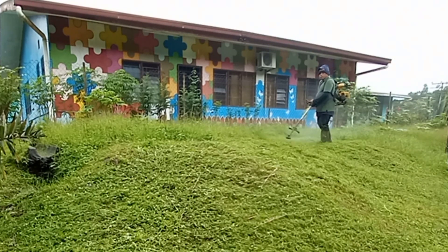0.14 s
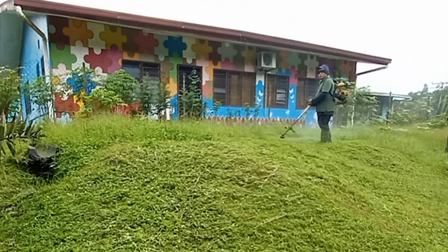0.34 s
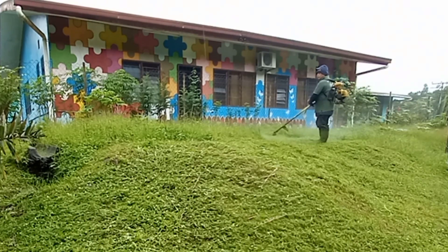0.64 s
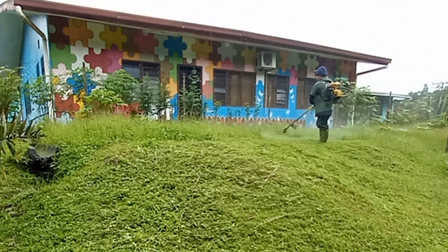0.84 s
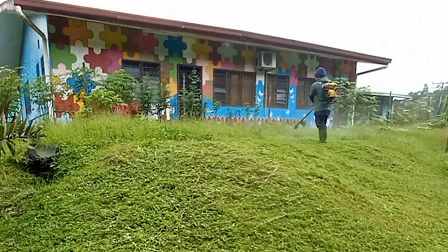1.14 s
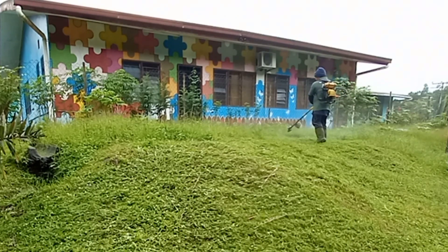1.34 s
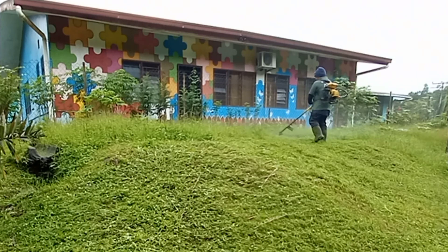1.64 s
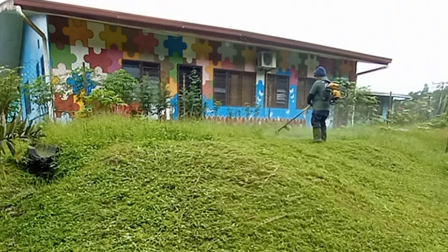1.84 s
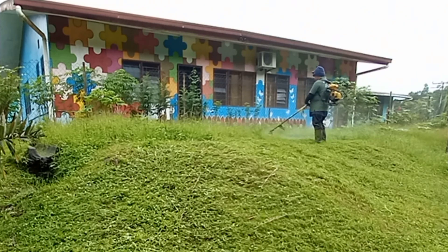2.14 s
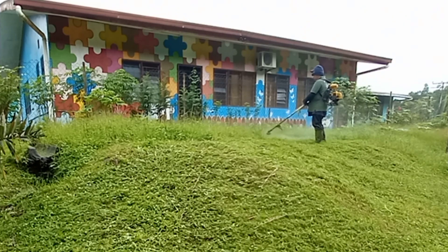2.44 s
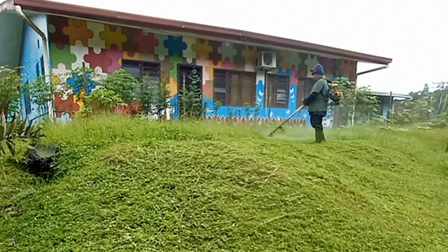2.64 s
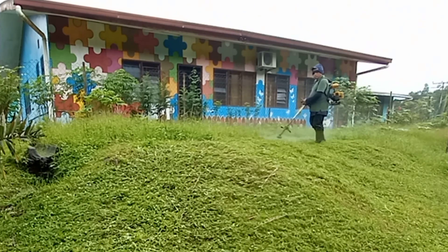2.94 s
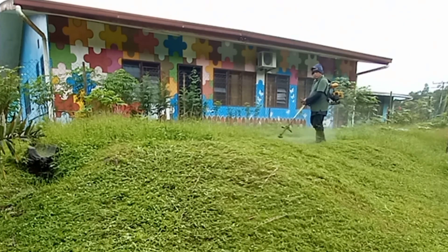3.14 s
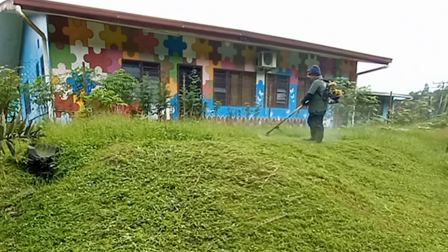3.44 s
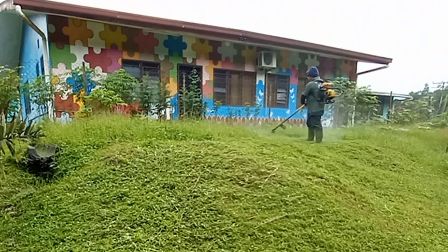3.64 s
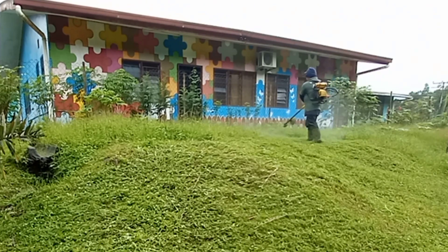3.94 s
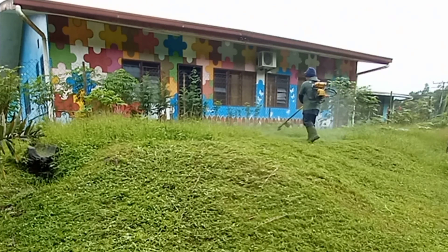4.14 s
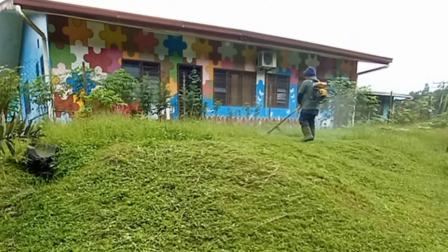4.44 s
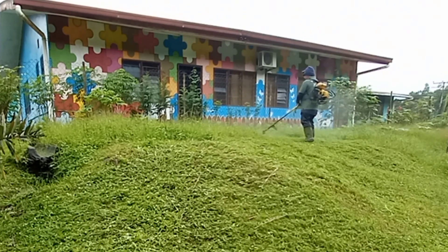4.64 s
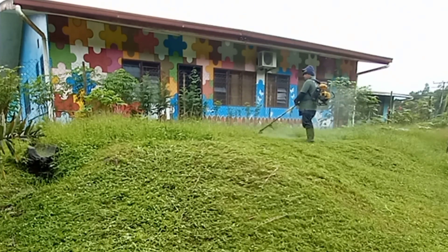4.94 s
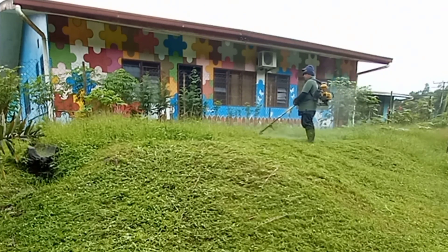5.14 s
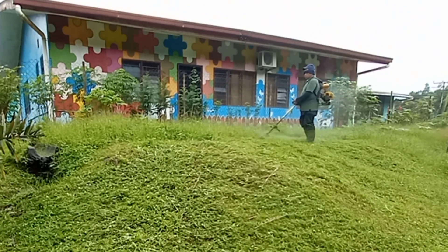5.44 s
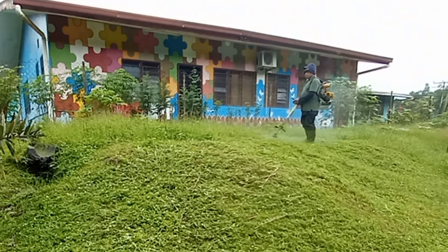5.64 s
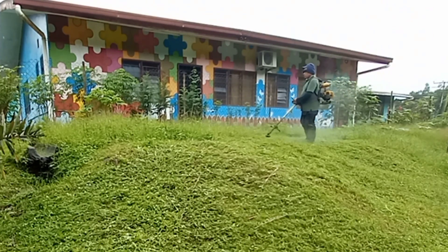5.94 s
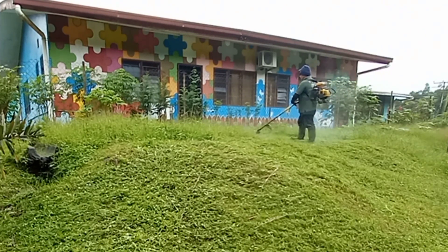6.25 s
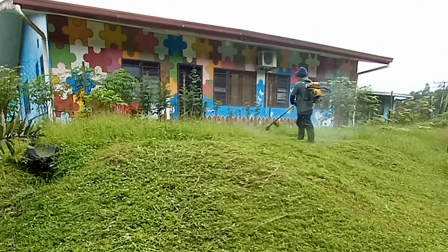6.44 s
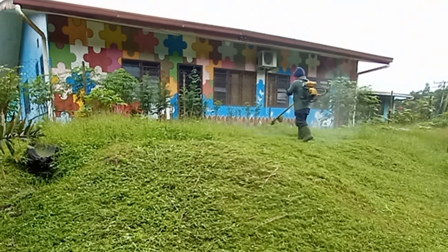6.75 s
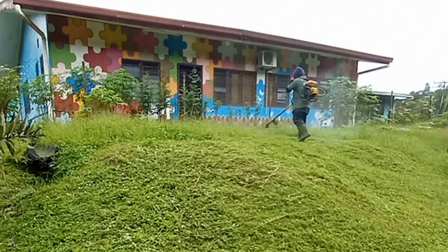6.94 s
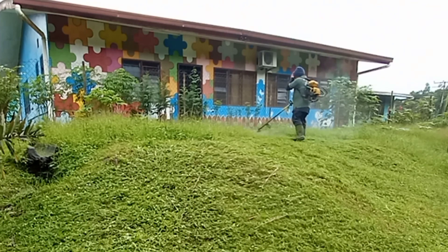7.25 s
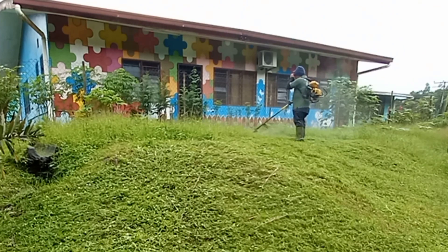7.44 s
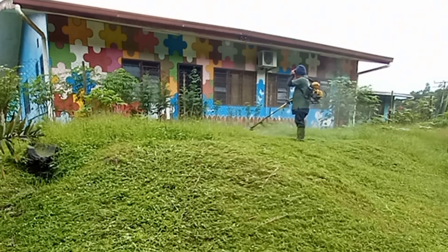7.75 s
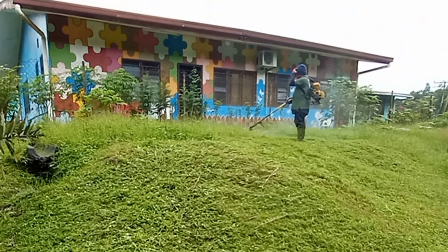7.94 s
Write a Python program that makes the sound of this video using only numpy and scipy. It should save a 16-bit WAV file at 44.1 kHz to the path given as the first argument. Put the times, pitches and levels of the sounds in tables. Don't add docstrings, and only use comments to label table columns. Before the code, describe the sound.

From 0 to about 8 seconds a backpack brush cutter works without a break, some metres from a stereo phone outdoors near a wall. Its small engine holds a low, buzzing drone near 116 hertz, with puffing muffler roar and gusty deep rumble; overtones wax and wane as the worker swings and walks. The blade hum wanders between about 80 and 112 hertz, beating against the engine: it sags in grass around 0.5-0.9, 1.5-2.9, 3.4-3.8, 4.3-5.5 and 6-6.6 seconds, recovering between. Pulsing bright hiss and crisp leaf tearing swell and thin with tufts. Tiny sharp stalk snaps scatter throughout, clustering near 0.8-0.9, 2.7, 4.0, 5.0-5.5 and 6.1 seconds, some with a duller knock. The hardest, at 2.24, 4.0 and 6.1, briefly duck everything. The sound ends still cutting, with snaps near 7.9-8.1.

```python
import sys
import numpy as np
from scipy import signal
from scipy.fft import rfft, irfft
from scipy.io import wavfile
from scipy.ndimage import uniform_filter1d

SR = 44100
rng = np.random.default_rng(int(sys.argv[2]) if len(sys.argv) > 2 else 0)


def file_out(sig):
    cols = np.atleast_2d(sig).T
    lim = np.clip(cols, -1, 1)
    pcm = np.round(lim * 32767).astype(np.int16)
    wavfile.write(sys.argv[1], SR, pcm)


def magnitude_from_level(level_db):
    exponent = np.asarray(level_db, float) / 20
    return 10 ** exponent


N = 356769
T = np.arange(N) / SR
SLOW_T = T[::64]


def evened(x):
    return x / np.sqrt(np.mean(x ** 2) + 1e-20)


def read(points, hz):
    f, value = np.transpose(points)
    return np.interp(np.log(hz + 1), np.log(f + 1), value)


def curves(rows):
    s, *columns = np.transpose(rows)
    return [np.interp(T, s, c) for c in columns]


def drift(top_hz):
    low_pass = signal.butter(2, top_hz, fs=SR, output="sos")
    return evened(signal.sosfilt(low_pass, rng.standard_normal(N)))


# frequency in Hz, share of sound in common (0-1).
PORT_LIKENESS = [(60, 1), (350, 0.84), (800, 1), (1400, 0.86), (2100, 0.47), (2800, 0.63), (4500, 0.45),
                 (15000, 0.15)]
# frequency in Hz, lead of the left in radians.
LEFT_LEAD = [(100, -.1), (1800, -1.5), (2500, -3.1), (5200, -4.3), (6400, -3.8), (8600, -2.8), (11200, -7),
             (16000, -11)]


def pair_noise(colour, patchy_db, focus=1):
    frames, hz = N // 128 + 5, np.fft.rfftfreq(512, 1 / SR)
    a, b, c, d, patches = rng.standard_normal((frames, 257, 5)).T
    patches = uniform_filter1d(patches, size=9, axis=0)
    patches = evened(uniform_filter1d(patches, size=20, axis=1))
    same = np.clip(read(PORT_LIKENESS, hz), 0, 1)[:, None] ** focus
    right = a + 1j * b
    left_own = c + 1j * d
    lead = np.exp(1j * read(LEFT_LEAD, hz))[:, None]
    left = same * right * lead + np.sqrt(1 - same ** 2) * left_own
    z = np.array([left, right]) * magnitude_from_level(read(colour, hz)[:, None] + patchy_db * patches)
    return evened(signal.istft(z, nperseg=512, noverlap=384)[1][:, :N])


def beat(turns, start, rise, fall, depth):
    u = (turns - start) % 1
    return evened(1 + depth * (1 - np.exp(-u / rise)) * np.exp(-u / fall))


# time in seconds, firings in Hz.
CRANK_SPEED = [(0.0, 115.9), (0.3, 116.64), (0.75, 117.37), (1.1, 116.47), (1.5, 115.92), (1.9, 116.3),
               (2.3, 116.53), (2.75, 116.33), (3.1, 116.31), (3.7, 117.27), (4.3, 115.92), (5.0, 116.41),
               (5.65, 115.98), (6.25, 117.37), (6.9, 115.84), (7.35, 116.26), (7.8, 116.25), (8.09, 116.15)]


def crank_turns():
    return np.cumsum(curves(CRANK_SPEED)[0]) / SR


# time in seconds, turn, lean, stoop (each about -2 to 2).
SWING_POSE = [(0.0, 0.16, 0.17, -1.5), (0.46, 0.54, 0.4, -1), (0.72, 1.2, -0.96, 2),
              (0.95, -0.16, 1.7, 3.2), (1.2, -1.73, 0.2, 1), (1.6, -1.3, 0.11, 0.7),
              (2.1, -0.69, -0.94, 1.5), (2.6, 0.86, -1.1, 0.6), (3.1, 1.26, 2.9, -0.5),
              (3.55, 1.4, -0.49, 1.5), (3.95, -1.45, 0.95, 1.3), (4.4, -0.81, 0.88, 1.8),
              (4.9, -0.72, -1.7, 0.5), (5.32, 1.45, -0.42, 0.4), (5.9, 2.1, 2.4, 2.5),
              (6.3, 0.59, -0.93, 0.2), (6.75, -1.07, 0.82, 0.1), (7.86, -0.31, -1.6, -0.2)]


def worker_pose():
    return curves(SWING_POSE)


# start in seconds, drag (0-1).
BLADE_DRAG = [(0, .03), (.48, 1.04), (.93, .16), (1.44, .88), (2.1, .58), (2.36, .7), (2.7, 1.1), (2.94, 0),
              (3.38, 1.18), (3.6, .92), (3.87, .06), (4.3, .9), (4.7, .52), (5.24, .82), (5.6, 0),
              (5.99, 1.14), (6.35, .85), (6.63, .03), (7.02, .5), (7.7, .36)]
FREE_HZ, SAG_HZ, START_HZ = 112, 31, 96
SPIN_UP_S, SAG_S = .17, .11
MID_HZ = 95


def blade_speed():
    hz, now = np.zeros(N), START_HZ
    for (s, drag), (end, _) in zip(BLADE_DRAG, BLADE_DRAG[1:] + [(N / SR, 0)]):
        goal = FREE_HZ - SAG_HZ * drag
        lag = SAG_S if goal < now else SPIN_UP_S
        hz = np.where(T >= s, goal + (now - goal) * np.exp(-abs(T - s) / lag), hz)
        now = goal + (now - goal) * np.exp((s - end) / lag)
    return uniform_filter1d(hz, size=3000)


# middle in seconds, half length in seconds, leaves in dB, stems in dB.
GRASS_TUFTS = [(0.262, 0.1, 0.77, -2), (0.528, 0.046, 4.5, 3.64), (0.62, 0.109, -0.2, 2),
               (0.862, 0.065, 0.3, 0.3), (1.188, 0.08, 1, -0.5), (1.487, 0.13, 0.64, 0.5),
               (1.85, 0.35, 1.06, 2.1), (2.274, 0.08, 4, 3), (2.496, 0.15, 3.5, 2),
               (2.768, 0.08, 2.98, 4.5), (2.955, 0.12, -1.35, 0.9), (3.196, 0.097, 0.4, -2),
               (3.424, 0.07, 2, 6.5), (3.53, 0.05, -1.23, 0.5), (3.76, 0.07, 4.5, -1),
               (3.994, 0.091, 0.04, -1.16), (4.25, 0.18, 3.5, -1.5), (4.448, 0.27, 0.23, 4.1),
               (4.7, 0.061, -0.04, -0.5), (4.915, 0.12, 2.5, 3), (5.32, 0.25, 2.2, 5),
               (5.679, 0.126, 0.36, 0.5), (5.999, 0.12, 1.5, 2.5), (6.1, 0.0344, 1.1, 3.69),
               (6.356, 0.15, 2.96, 1.3), (6.85, 0.3, 3.5, -1), (7.207, 0.11, 1.35, 4), (7.545, 0.25, 2, 3),
               (7.75, 0.1, 3.5, 0), (8.048, 0.2, 4, 3.5)]


def tufts():
    s, half, leaf_db, stem_db = np.transpose(GRASS_TUFTS)
    bells = np.exp(-((SLOW_T[:, None] - s) / half) ** 2)
    return [np.interp(T, SLOW_T, bells @ db) for db in (leaf_db, stem_db)]


# frequency in Hz, level in dB per Hz.
RUMBLE_COLOUR = [(20, -30), (50, -11), (75, -7), (100, -6.5), (130, -4.5), (170, -7.5), (200, -7)]
# frequency in Hz, level in dB per Hz.
ROAR_COLOUR = [(170, -54), (250, -6.5), (500, -5), (900, -5.5), (1600, -7.5), (2100, -11), (2800, -12.5),
               (4000, -51)]


def roar(turns, fast, stem_db):
    level_db = -33 - 0.02 * fast + stem_db
    hz = np.fft.rfftfreq(N, 1 / SR)
    shared, left, right = rng.standard_normal((3, N))
    gusts = np.array([left, right]) * magnitude_from_level(9.5 * drift(4.0))
    low = rfft(shared) + rfft(gusts) * 0.67 / (1 + (hz / 55) ** 2)
    rumble = evened(irfft(low * magnitude_from_level(read(RUMBLE_COLOUR, hz)) * (hz < 200), N))
    puffs = beat(turns, 0.476, 0.04, 0.11, depth=0.86)
    body = pair_noise(ROAR_COLOUR, patchy_db=1.82) * puffs
    return magnitude_from_level(level_db) * (body + magnitude_from_level(-9.0) * rumble)


def fan(turns):
    return beat(turns, .75, .05, .13, depth=.9)


def strokes(passes, spread_db, lopsided_db):
    chance = np.minimum(rng.exponential(1, size=1200), 4)
    load_db = chance * spread_db + lopsided_db * (np.arange(1200) % 2)
    return beat(passes, 0, 0.023, 0.13, depth=0.41 * magnitude_from_level(load_db[passes.astype(int)]))


# frequency in Hz, level in dB per Hz.
HISS_COLOUR = [(1500, -37), (2300, -8.5), (3000, 1.5), (4200, 0), (5200, -0.5), (6500, -5.5), (9000, -8.5),
               (16000, -19)]


def hiss(turns, passes, fast, leaf_db, turn):
    level_db = -38.0 + 0.095 * fast + 0.32 * leaf_db - 0.72 * turn
    air = pair_noise(HISS_COLOUR, patchy_db=0.5)
    pulses = fan(turns) * strokes(passes, spread_db=4.5, lopsided_db=-7.0)
    return magnitude_from_level(level_db + 4.0) * air * pulses


# frequency in Hz, level in dB per Hz.
SHRED_COLOUR = [(3000, -7), (5500, -9), (7000, 1.5), (8500, -1.5), (11000, 3), (12500, 4.5), (13800, 3),
                (16000, -0.5)]


def shred(turns, passes, fast, leaf_db):
    level_db = -37 + 0.0463 * fast + leaf_db
    tearing = pair_noise(SHRED_COLOUR, patchy_db=1.0)
    pulses = fan(turns) * strokes(passes, spread_db=4, lopsided_db=11.0)
    return magnitude_from_level(level_db + 1.37) * tearing * pulses


# start in seconds, bright part in dB, length in ms, dull part in dB.
HARD_SNAPS = [(.8075, -21, 0.89, -12), (.8437, -20, 0.6, -20), (.9194, -20, 0.98, -22),
              (1.899, -24, 1.27, -10), (2.2937, -22, 1.1, -22), (2.3894, -24, 2.1, -11),
              (2.6982, -23, 1, -4), (2.7454, -23, 0.84, -9), (3.6985, -21, 1.1, -20),
              (3.7619, -25, 0.88, -20), (3.9562, -25, 1.0, -19), (3.9955, -22.5, 3.4, -17),
              (4.1868, -24, 1.1, -15), (4.2969, -20, 1.02, -20), (4.9721, -21, 1.22, -16),
              (5.0149, -23, 1.27, -16), (5.1598, -24, 1.2, -13), (5.2563, -19, 1.15, -42),
              (5.3335, -22, 1.12, -16), (5.4204, -21, 1.3, -12), (5.533, -22, 1.2, -20),
              (6.0187, -23, 1.2, -21), (6.0964, -24, 1.2, -20), (6.1025, -18.5, 3.3, -17),
              (6.1335, -24, 1.05, -20), (6.4523, -20, 0.88, -12), (6.524, -26, 1.87, -9),
              (7.7461, -30, 1.0, -9), (7.9096, -23.5, .99, -13), (8.0694, -23, 0.96, -20)]
# start in seconds, bright part in dB.
TWIG_SNAPS = [(.6373, -26), (.857, -25), (1.1827, -28), (1.232, -30), (1.8769, -28), (2.2376, -29),
              (2.4337, -27), (2.4477, -25), (2.6538, -28), (2.7692, -24), (2.781, -26), (2.793, -24),
              (3.407, -22), (3.4936, -26), (3.546, -26), (3.597, -23), (4.111, -23), (4.9084, -25),
              (5.2022, -24.5), (5.287, -26), (5.353, -22), (5.4423, -24), (5.5098, -26), (5.9413, -23),
              (5.9795, -24), (6.3307, -24), (6.5848, -26), (6.7293, -25), (7.9877, -24), (8.0314, -24)]
TWIG_MS, TWIG_DULL_DB = 1.3, -19.5
# frequency in Hz, level in dB per Hz.
CRACK_COLOUR = [(4500, -5), (7000, 5), (9000, 0), (11500, 5), (13500, 1), (16000, -3.5)]


def snaps():
    twigs = [(s, db, TWIG_MS, TWIG_DULL_DB) for s, db in TWIG_SNAPS]
    s, db, length_ms, low_db = np.transpose(HARD_SNAPS + twigs)
    u = np.arange(600) / SR / (0.0012 * np.clip(length_ms, .3, 6))[:, None]
    shape = np.sin(np.pi * np.clip(u / 1.4, 0, 1) ** 1.14) + 0.088 * np.exp(-u / 1.3)
    at = np.round(s * SR).astype(int)[:, None] + np.arange(600) - 6
    bright, dull = np.zeros((2, N + 600))
    np.add.at(bright, at, magnitude_from_level(db + 1.6)[:, None] * shape)
    np.add.at(dull, at, magnitude_from_level(db + low_db + 9.5)[:, None] * shape)
    crack = bright[:N] * pair_noise(CRACK_COLOUR, patchy_db=-1.5, focus=0.62)
    thud = dull[:N] * pair_noise(HISS_COLOUR, patchy_db=9.5, focus=0.37)
    return crack + thud


def thrum(passes, fast, stem_db):
    level_db = -38.5 + 0.31 * fast + 0.22 * stem_db
    tone = np.cos(2 * np.pi * passes) + magnitude_from_level(-11.5) * np.cos(4 * np.pi * passes)
    return np.sqrt(2) * magnitude_from_level(level_db + 1.2 * drift(23)) * tone


# rms in dB, dB per turn, dB per lean, dB per stoop, dB per step.
EXHAUST_ORDERS = [(-21, 0.4, -0.44, 0.27, -0.5), (-37, -3.5, -0.04, 1.5, 1.06),
                  (-37.5, -0.2, -0.5, -4, 1.5), (-34, -0.5, -0.2, 0.5, 1.85), (-35.5, 1, -1.0, 0.1, -0.45),
                  (-34.6, -2.5, -1.5, -0.45, -1.2), (-40.5, 0.5, -0.7, -0.3, 0.1),
                  (-44, -0.3, 0, -0.2, -1.5), (-41.5, -2.2, 1.6, -0.4, -0.5), (-48, 2.5, -0.5, -2, -1),
                  (-60, -8, 8.5, -1.5, -1), (-44, -2.9, 1.5, 1.7, 1.5), (-43.5, -3, 1.7, -1, -1.4),
                  (-52, -1, -1, 4.5, 11.5), (-52.5, -4.5, 1.5, 1.5, 3), (-57.0, -3, 5, 3, 1),
                  (-60.5, 7, -6, -0.5, -3), (-49.5, -1, -3, -2, -2), (-55.1, -6, -6, -7, 0),
                  (-48, -3, 2, 0.2, 1.8)]
STEP_START, STEPS_PER_S = -1.84, 0.33


def exhaust(turns, pose):
    turn, lean, stoop = (c[::64] for c in pose)
    step = STEP_START + STEPS_PER_S * SLOW_T
    lead = .215 + .025 * turn
    uneven_burning = 0.0021 * drift(25) + 0.0053 * drift(3.7)
    crank = np.exp(2j * np.pi * (turns + uneven_burning))
    scatter = rng.standard_normal((len(EXHAUST_ORDERS), 2, len(turn)))
    scatter = uniform_filter1d(scatter, size=250, axis=2)
    scatter = evened(uniform_filter1d(scatter, size=250, axis=2))
    out, order = np.zeros((2, N)), 1
    for i, (row, (re, im)) in enumerate(zip(EXHAUST_ORDERS, scatter)):
        k = i + 1
        db, turn_db, lean_db, stoop_db, step_db = row
        order = order * crank
        twin = np.angle(1 + (k > 1) * 1.53 * np.exp(2j * np.pi * k * lead))
        level_db = db + turn_db * turn + lean_db * lean + stoop_db * stoop + step_db * step
        size = np.sqrt(2) * magnitude_from_level(level_db) * np.exp(1j * twin)
        size *= np.exp(-2j * np.pi * k * .6 * (k > 8))
        stray = min(0.095 * (k - .6), .24) * (re + 1j * im)
        echoes = 1 + stray, 1 - stray
        for ear, late_s in enumerate((.00015, 0)):
            heard = size * echoes[ear] * np.exp(-2j * np.pi * k * 122.0 * late_s)
            out[ear] -= (np.interp(T, SLOW_T, heard) * order).real
    return out * magnitude_from_level(0.46 * drift(5.7))


def scene():
    turns = crank_turns()
    pose = worker_pose()
    pass_hz = blade_speed()
    passes = np.cumsum(pass_hz) / SR
    fast = pass_hz - MID_HZ
    leaf_db, stem_db = tufts()
    leaves = hiss(turns, passes, fast, leaf_db, pose[0]) + shred(turns, passes, fast, leaf_db)
    blade = thrum(passes, fast, stem_db)
    engine = exhaust(turns, pose) + roar(turns, fast, stem_db)
    return engine + blade + leaves + snaps()


def roll_off(x):
    return signal.sosfilt(signal.butter(12, 16610, fs=SR, output="sos"), x)


# peak in Hz, width in Hz, lift in dB.
PORT_PEAKS = [(9530, 870, 6.5), (8230, 1400, 8.3)]
# start in seconds, dip in dB.
LIMITER_DIPS = [
    (2.24, -2),
    (3.997, -4),
    (6.104, -2.5),
]
EDGE_HZ = 15760


def record(dry):
    hz = np.fft.rfftfreq(N, 1 / SR)
    lift = [db / (1 + ((hz - f) / w * np.where(hz < f, 2.5, .8)) ** 2) for f, w, db in PORT_PEAKS]
    balance_db = [[.4], [-.4]]
    dip_db = sum(db * (T > s) * np.exp(-abs(T - s) / 0.036) for s, db in LIMITER_DIPS)
    ducked = dry * magnitude_from_level(uniform_filter1d(dip_db, size=90))
    mix = irfft(rfft(ducked) * magnitude_from_level(np.array(lift) + balance_db) * (hz < EDGE_HZ), N)
    return roll_off(mix)


dry = scene()
out = record(dry)
file_out(out)
```